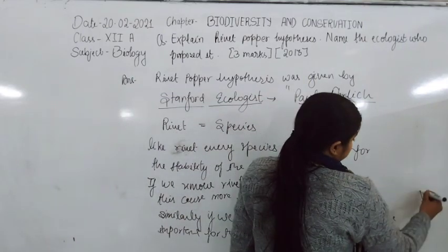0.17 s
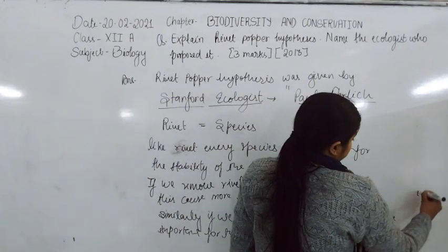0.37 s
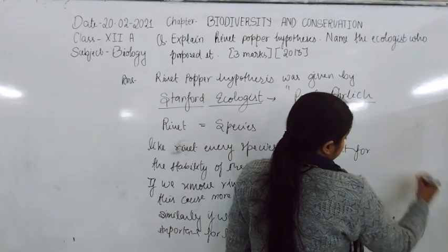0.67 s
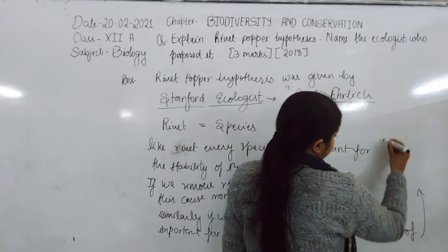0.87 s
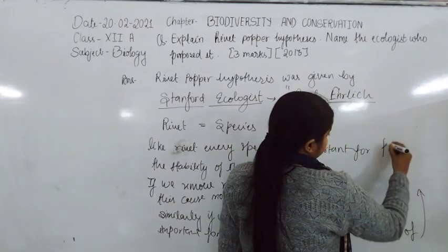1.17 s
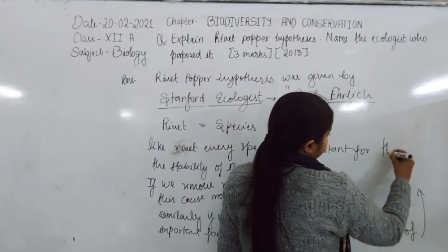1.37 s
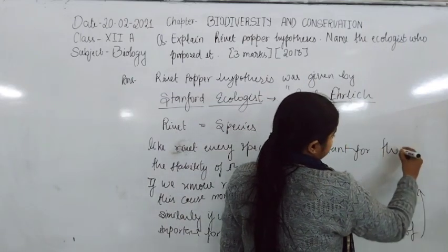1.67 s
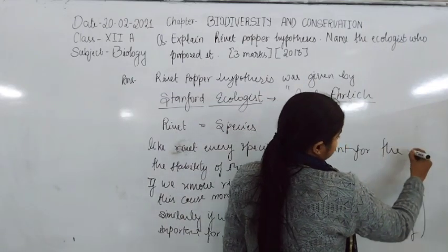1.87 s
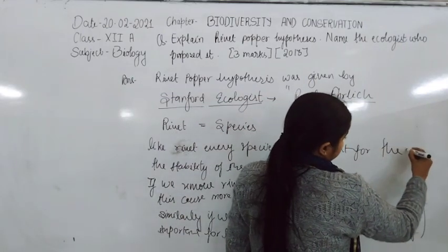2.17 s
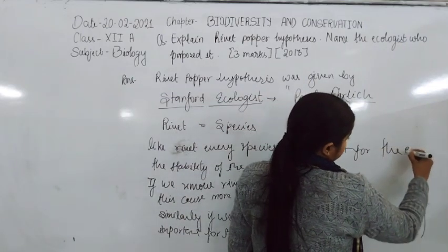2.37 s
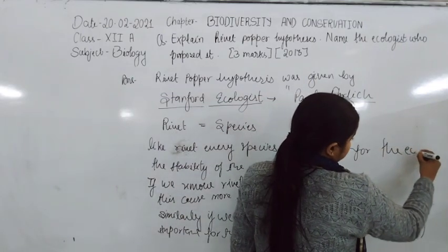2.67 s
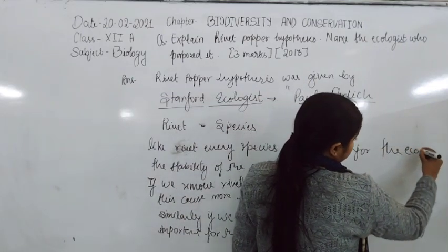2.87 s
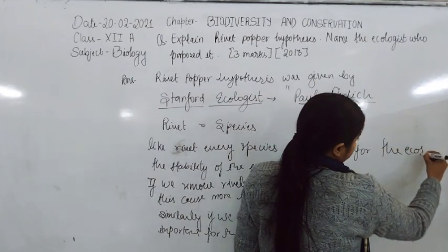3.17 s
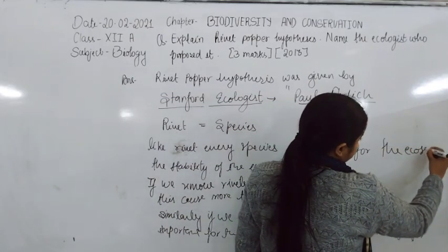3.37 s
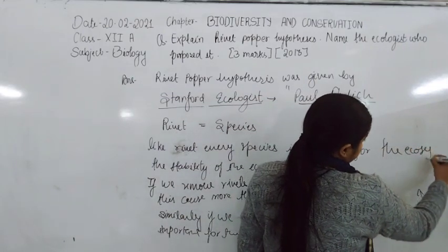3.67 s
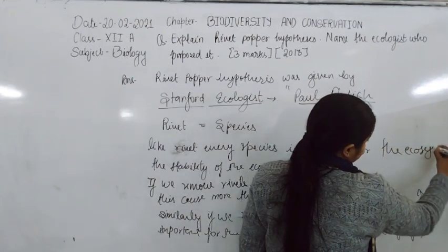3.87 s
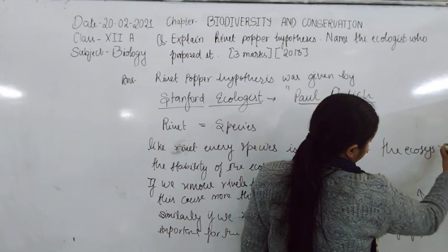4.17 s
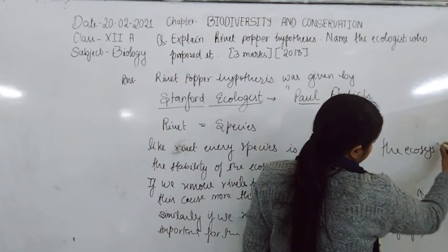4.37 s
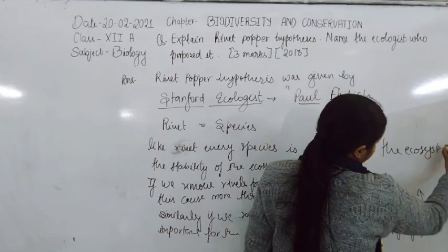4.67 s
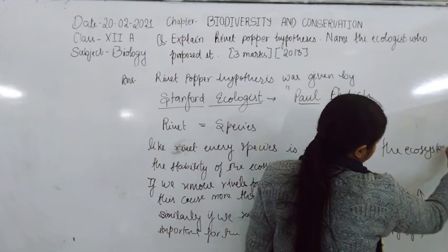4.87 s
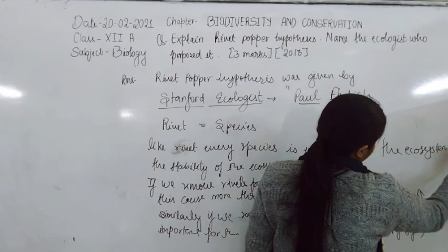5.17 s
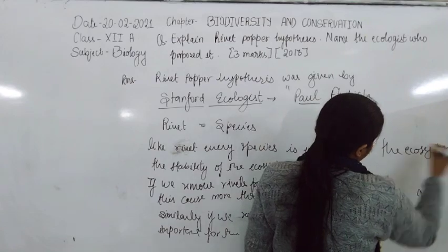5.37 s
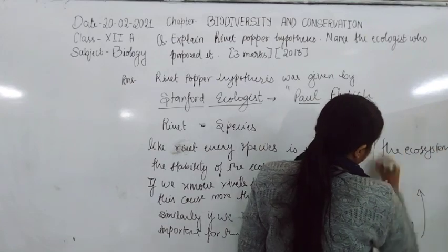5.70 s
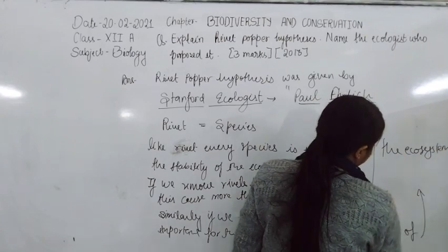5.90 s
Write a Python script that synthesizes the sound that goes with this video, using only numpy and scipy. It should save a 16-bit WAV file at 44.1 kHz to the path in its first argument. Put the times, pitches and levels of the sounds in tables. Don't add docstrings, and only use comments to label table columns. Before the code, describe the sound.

A blurred scuff and quick strokes come first, then a firm knock and a run of uneven, bright, fibrous hisses in the right channel. Two faint high squeaks follow, reverberating in the hard empty room. Dull taps on the hollow panel punctuate the later strokes, the loudest near the end. A close stereo recorder with noise suppression makes the faint background pump between sounds.

```python
import sys
import numpy as np
from scipy import signal
from scipy.io import wavfile

SR = 44100
rng = np.random.default_rng(int(sys.argv[2]) if len(sys.argv) > 2 else 0)


def generate_wav(signal):
    frames = np.transpose(np.atleast_2d(signal))
    scaled = np.clip(frames, -1, 1) * 32767
    pcm = np.round(scaled).astype(np.int16)
    wavfile.write(sys.argv[1], SR, pcm)


def field_ratio(decibels):
    return 10 ** (np.asarray(decibels, dtype=float) / 20)


N = 266231
TIME = np.arange(N) / SR
LEAD = SR // 2


def at_hz(hz, points, column=1):
    table = np.array(points)
    return np.interp(np.log(hz), np.log(table[:, 0]), table[:, column])


def rms_one(x):
    return x / np.sqrt(np.mean(x ** 2) + 1e-20)


def resonance(x, hz, width_hz):
    r = np.exp(-np.pi * width_hz / SR)
    zeros = np.array([1, 0, -1]) * (1 - r * r) / 2
    return signal.lfilter(zeros, [1, -2 * r * np.cos(2 * np.pi * hz / SR), r * r], x)


def smooth(x, hz):
    r = np.exp(-2 * np.pi * hz / SR)
    return signal.lfilter([1 - r], [1, -r], x)


def waver(hz):
    step = max(1, int(SR / 100 / hz))
    coarse = rng.standard_normal(N)[::step]
    coarse = rms_one(smooth(smooth(coarse, hz * step), hz * step))
    return np.interp(np.arange(N) / step, np.arange(len(coarse)), coarse)


# (frequency [Hz], left-right likeness [0 to 1])
LIKENESS = [(40, 0.7), (80, 0.87), (140, 0.73), (220, 1), (330, 0.78), (500, 0.58), (750, 0.26),
            (1100, 0.0)]


def noise_bands(size):
    edges = 22 * 2 ** (np.arange(30) / 3)
    white = rng.standard_normal((2, 2, size)) * np.sqrt(SR / 4)
    for k, (low, high) in enumerate(zip(edges, edges[1:])):
        band_pass = signal.butter(2, [low, high], "band", fs=SR, output="sos")
        mid, side = signal.sosfilt(band_pass, white[k % 2])
        hz = np.sqrt(low * high)
        alike = np.clip(at_hz(hz, LIKENESS), -1, 1)
        yield hz, np.sqrt(1 + alike) * mid + np.sqrt(1 - alike) * side * [[1], [-1]]


# (frequency [Hz], left level [dB per Hz], right level [dB per Hz])
TONE = [(30, -108, -107), (60, -105, -104), (98.6, -110, -109), (141, -95, -93), (217, -94, -93),
        (410, -99.5, -97.5), (678, -101, -100), (1045, -109, -107), (1960, -112, -110), (3960, -118, -114),
        (6500, -122, -115), (7850, -124, -109), (10150, -124, -116), (16400, -124, -116)]


def room_tone(patchy_db):
    out = 0
    for hz, band in noise_bands(size=N):
        left_right_db = [[at_hz(hz, TONE, column=1)], [at_hz(hz, TONE, column=2)]]
        out = out + band * field_ratio(patchy_db * waver(8)) * field_ratio(left_right_db)
    return out


def suppressor(near, shut_db, slope, depth_db, attack_hz, release_db_s):
    level_db = 10 * np.log10(smooth(near ** 2, 38) + 1e-12)
    open_db = np.clip(slope * (level_db - shut_db), 0, depth_db)
    sunk_db = release_db_s * TIME
    held_db = np.maximum.accumulate(open_db + sunk_db, axis=1) - sunk_db
    return field_ratio(smooth(held_db, attack_hz))


# (frequency [Hz], time to fall 60 dB [s])
ROOM_T60 = [(100, 0.44), (260, 0.49), (700, 0.94), (1800, 0.58), (5000, 1)]


def classroom(x, build_s, early, early_s):
    age = np.arange(SR) / SR
    echo = 0
    for hz, band in noise_bands(size=SR):
        dying = band * field_ratio(-60 * age / at_hz(hz, ROOM_T60))
        echo = echo + np.sqrt(hz) * rms_one(dying)
    echo = echo * (1 - np.exp(-age / build_s)) * (1 + early * np.exp(-age / early_s))
    echo = echo / np.sqrt(np.sum(echo ** 2) / 2)
    return signal.fftconvolve(np.atleast_2d(x), echo, axes=1)[:, :x.shape[-1]]


# (time [s], level [dB], start [Hz], end [Hz], length [s])
SQUEAKS = [(2.65, -51, 1572, 1568, 0.15), (2.72, -64, 1590, 1590, 0.61), (3.47, -59, 1680, 1960, .08),
           (3.521, -51, 1896, 1890, 0.11), (3.52, -53.5, 1987, 1998, 0.45)]
# (time [s], level [dB], frequency [Hz], length [s], width [Hz])
SCUFFS = [(0.0, -54, 1340, 0.11, 295), (1.885, -57, 2740, 0.12, 300), (5.129, -63.5, 2750, 0.52, 350),
          (5.437, -53.5, 3035, 0.037, 900), (5.44, -54.5, 4700, 0.037, 900)]


def squeaks(rise, steady):
    clear = [(*row, 42) for row in SQUEAKS]
    blurred = [(s, level_db, hz, hz, length, width_hz) for s, level_db, hz, length, width_hz in SCUFFS]
    out = np.zeros(N)
    for s, level_db, start_hz, end_hz, length, width_hz in clear + blurred:
        u = np.clip((TIME - s) / length, 0, 1)
        turns = np.cumsum(start_hz + (end_hz - start_hz) * u) / SR
        shape = (1 - np.exp(-u / rise)) * (1 - u) ** 2.13
        slips = steady * np.exp(-width_hz / 50) + waver(width_hz) / 2
        out += field_ratio(level_db) * shape * slips * np.sin(2 * np.pi * turns)
    return out


# (fastest
# moment [s], hiss level [dB], speeding up [s], slowing down [s])
STROKES = [(0.004, -53, 0.034, 0.093), (0.157, -62.0, 0.018, 0.148), (0.223, -54.5, 0.046, 0.16),
           (0.323, -52.5, 0.036, 0.16), (0.712, -65, 0.055, 0.12), (0.779, -58.5, 0.11, 0.22),
           (0.828, -65, 0.06, 0.27), (1.064, -60, 0.12, 0.068), (1.074, -59.5, 0.008, 0.101),
           (1.168, -61.0, 0.042, 0.166), (1.272, -57.5, 0.155, 0.097), (1.431, -58.5, 0.17, 0.19),
           (1.573, -59.5, 0.071, 0.17), (1.846, -52, 0.005, 0.031), (1.847, -65, 0.009, 0.184),
           (1.981, -69.0, 0.048, 0.13), (2.094, -58.5, 0.074, 0.13), (2.181, -55, 0.054, 0.092),
           (2.246, -58.5, 0.102, 0.14), (2.381, -52, 0.01, 0.075), (2.439, -59.0, 0.079, 0.16),
           (2.572, -62.5, 0.025, 0.171), (2.67, -56.5, 0.052, 0.11), (2.755, -56.0, 0.042, 0.058),
                (2.831, -54.5, 0.052, 0.13), (3.048, -64.5, 0.3, 0.054), (3.129, -58.5, 0.082, 0.1),
                (3.215, -63.5, 0.052, 0.12), (3.289, -54.5, 0.066, 0.167), (3.567, -58, 0.3, 0.061),
                (3.606, -55, 0.038, 0.18), (3.756, -64.0, 0.047, 0.024), (3.807, -62, 0.088, 0.049),
                (3.871, -59.5, 0.066, 0.021), (4.308, -58.5, 0.091, 0.23), (4.476, -60.5, 0.051, 0.098),
                (4.576, -56.0, 0.065, 0.061), (4.64, -60, 0.077, 0.09), (4.782, -60.5, 0.05, 0.1),
                (4.897, -62, 0.053, 0.134), (4.99, -65, 0.087, 0.067), (5.04, -55.5, 0.036, 0.13),
                (5.091, -59.0, 0.022, 0.17), (5.3, -76, 0.3, 0.33), (5.446, -67, 0.077, 0.042),
                (5.466, -66, 0.009, 0.05), (5.566, -57.5, 0.16, 0.198), (5.716, -60, 0.27, 0.24),
                (6.026, -53, 0.26, 0.18)]
# (time [s], hiss level [dB], speeding up [s], slowing down [s])
SKIDS = [(2.829, -51.5, .008, .03), (5.027, -63, .006, .03), (5.417, -64.5, .005, .014),
         (5.471, -62, .007, 0.014), (5.52, -67, .012, .06)]
# (time [s], dullness [dB])
LEAN = [(0, -2), (.35, 3.5), (.8, -3), (1.2, 1.5), (2.15, 0), (2.4, 6), (2.6, 3), (2.8, -1), (3.1, 0.5),
        (3.9, 1), (4.3, -1.5), (4.9, 2), (5.04, -2), (5.15, 2), (5.45, 1.5), (5.56, -10), (5.75, -1),
        (6.04, -1.5)]
# (frequency [Hz], width [Hz], level [dB])
PORT = [(7050, 630, -12), (7585, 300, -6), (7810, 230, -4.5), (8440, 380, -1.5), (8860, 190, 1),
        (9220, 290, -3.5), (9850, 360, -8), (10390, 580, -11.5), (13300, 8600, -25.5)]


def strokes(per_s, size_db, flutter_db, shift_db, rest_db):
    hiss_per_speed = 4.2
    power = np.full(N, field_ratio(2 * rest_db))
    for s, level_db, up_s, down_s in STROKES + SKIDS:
        span = slice(max(0, int((s - up_s) * SR)), int((s + down_s) * SR))
        late = TIME[span] - s
        phase = np.clip(np.where(late < 0, -late / up_s, late / down_s), 0, 1)
        speed = np.abs(np.cos(np.pi / 2 * phase))
        power[span] += (field_ratio(level_db) * speed ** hiss_per_speed) ** 2
    hiss_db = 10 * np.log10(power)

    lean_db = np.interp(TIME, *np.transpose(LEAN))
    dull_db = -3 + lean_db - 0.21 * np.maximum(hiss_db + 64.5, -6)
    hiss_db = hiss_db + flutter_db * waver(43)

    sizes = field_ratio(size_db * np.minimum(rng.exponential(1, (2, N)), 4))
    clicks = sizes * rng.choice([-1, 1], (2, N))
    bright, dull = clicks * (rng.random((2, N)) < per_s / SR)

    port = np.zeros(N)
    for k, (hz, width_hz, db) in enumerate(PORT):
        weight = field_ratio(db + shift_db * waver(10.7))
        port += (-1) ** k * weight * resonance(bright, hz, width_hz)
    port = signal.sosfilt(signal.butter(4, 5800, "high", fs=SR, output="sos"), port)

    felt_hz, felt_width_hz = 6340, 990
    felt = resonance(dull, felt_hz, felt_width_hz)
    felt = resonance(felt, felt_hz, 2.0 * felt_width_hz)
    return field_ratio(hiss_db) * (rms_one(port) + field_ratio(dull_db - 7.0) * rms_one(felt))


# (time [s], peak level [dB], brightness [dB], left-right [dB])
KNOCKS = [(0.150, -36.5, -3, -2.5), (0.63, -67, 9.5, -5), (0.704, -28.5, 6, 0), (0.988, -40.5, -23, -3),
          (1.847, -32.5, 3.5, -2.5), (2.38, -31.5, 5, -2), (2.564, -43, -9, -5), (4.019, -79, -18, 5),
          (4.232, -36.5, 0.5, -3), (4.44, -49, -4, -3.5), (4.750, -36.5, -0.5, -2.5), (4.993, -63, 0, -5),
          (5.39, -69.5, 15.5, -13), (5.513, -23, -0.5, -2)]
# (time [s], peak level [dB], brightness [dB], left-right [dB])
EARLIER_KNOCK = (-0.04, -50.5, 1, -6)
# (frequency [Hz], level [dB], time to fall 60 dB [s])
BOARD = [(194.7, -15.5, 0.25), (226, -2, 0.067), (284.5, 1, 0.043), (328.8, -3, 0.15), (377.5, -9, 0.16),
         (447, 0, 0.049), (513, -22, 0.092), (550.5, -14.5, 0.089), (631, 0.5, 0.019), (671, -23, 0.063),
         (767, -6.5, 0.031), (900, -37, 0.061), (806, -13, 0.017), (1010, -18, 0.025), (1450, -17, 0.019),
         (2050, -37, .015), (3000, -41, 0.012)]


def knocks(contact_hz, panel_low_hz, crack_db, crack_hz, spread_db):
    s, peak_db, bright_db, pan_db = np.transpose([EARLIER_KNOCK, *KNOCKS])
    at = np.round(s * SR).astype(int) + LEAD
    spot_db = spread_db * rng.standard_normal((len(at), len(BOARD)))
    settle = at + np.round(SR * rng.uniform(0.002895, 0.00793, len(at))).astype(int)
    settle_db = rng.normal(-10.0, 8.65, (len(at), len(BOARD)))

    ring, push = np.zeros(N + LEAD), np.zeros(N + LEAD)
    for k, (hz, mode_db, t60) in enumerate(BOARD):
        tilt_db = bright_db * np.clip(np.log2(hz / 300), 0, 1)
        push[at] = field_ratio(peak_db + mode_db + spot_db[:, k] + tilt_db)
        push[settle] = push[at] * field_ratio(settle_db[:, k])
        r, w = field_ratio(-60 / (t60 * SR)), 2 * np.pi * hz / SR
        ring += signal.lfilter([0, -np.sin(w)], [1, -2 * r * np.cos(w), r * r], push + 1e-18)
    ring = smooth(smooth(ring, contact_hz), contact_hz)

    push[settle] = 0
    push[at] = field_ratio(peak_db + bright_db + crack_db)
    rattle = smooth(smooth(push, 28), 13) * rng.standard_normal(N + LEAD)
    crack = resonance(rattle, crack_hz, 0.6 * crack_hz)

    side = np.zeros(N + LEAD)
    side[at] = np.diff(pan_db, prepend=0)
    thin = signal.butter(8, panel_low_hz, "high", fs=SR, output="sos")
    return signal.sosfilt(thin, ring + crack), np.cumsum(side)


def duck(depth_db, ahead_s, back_s):
    dip = np.zeros(N)
    for s, peak_db, *_ in KNOCKS:
        strength = np.clip((peak_db + 58) / 9, 0, 1)
        closing = np.clip(2 * (1 - (s - TIME) / ahead_s), 0, 1)
        dip += strength * closing * np.exp(np.minimum(s - TIME, 0) / back_s)
    return field_ratio(-depth_db * dip)


def scene():
    board, pan_db = knocks(contact_hz=954, panel_low_hz=179, crack_db=38.0, crack_hz=1500, spread_db=1.5)
    tip = np.pad(squeaks(rise=0.036, steady=0.66), (LEAD, 0))
    wet = classroom(field_ratio(-3.0) * board + field_ratio(-5.0) * tip, build_s=0.0068, early=0.55, early_s=0.024)
    far_wall = np.pad(smooth(board, 500), (int(0.087 * SR), 0))[:len(board)]
    wet = wet + field_ratio(-12.5) * far_wall

    direct = field_ratio(-4.0) * smooth(board, 690) + field_ratio(-2.5) * tip
    near = (direct + wet) * field_ratio(np.outer([0.5, -0.5], pan_db))
    hiss = strokes(per_s=9900, size_db=-5.0, flutter_db=1.0, shift_db=2.5, rest_db=-82.5)
    near = near[:, LEAD:] + hiss * field_ratio([[-33.0], [6.0]])

    gain = suppressor(near, shut_db=-77.5, slope=0.33, depth_db=28.5, attack_hz=47, release_db_s=183)
    return near + room_tone(patchy_db=2.0) * gain


def low_pass(x):
    return signal.sosfilt(signal.butter(12, 16410, fs=SR, output="sos"), x)


def record(dry):
    ducked = dry * duck(depth_db=5.5, ahead_s=0.0095, back_s=0.0026)
    top_cut = signal.cheby2(20, 50, 16400, fs=SR, output="sos")
    mix = signal.sosfilt(top_cut, ducked) + 0.00025
    return low_pass(mix)


dry = scene()
out = record(dry)
generate_wav(out)
```